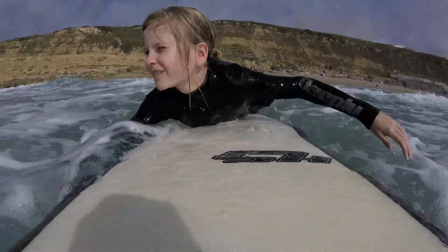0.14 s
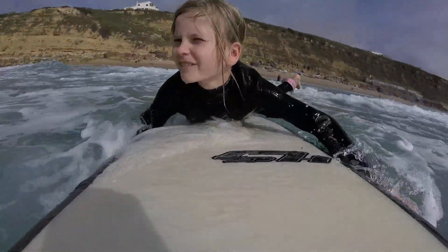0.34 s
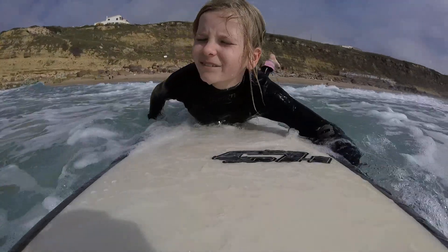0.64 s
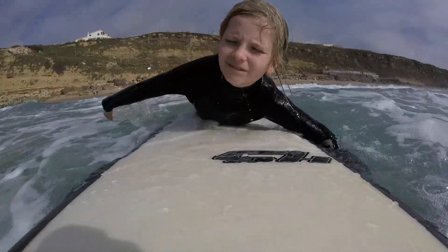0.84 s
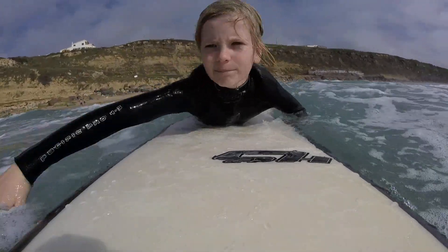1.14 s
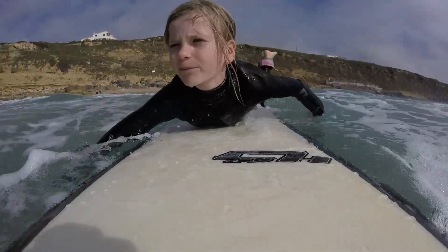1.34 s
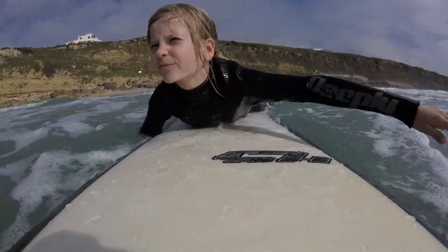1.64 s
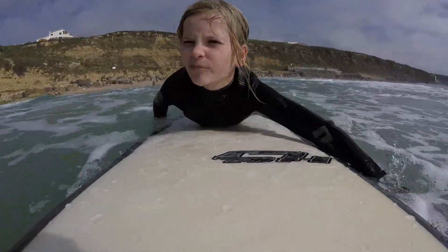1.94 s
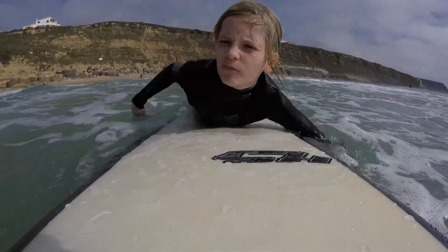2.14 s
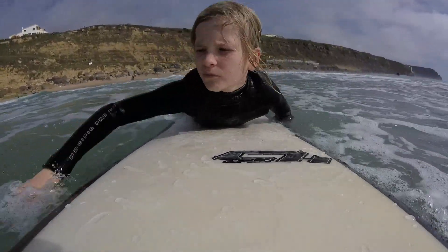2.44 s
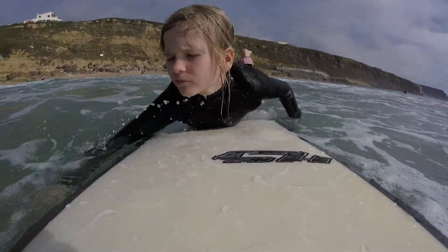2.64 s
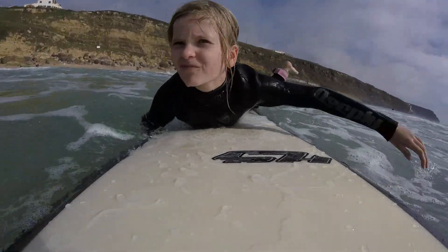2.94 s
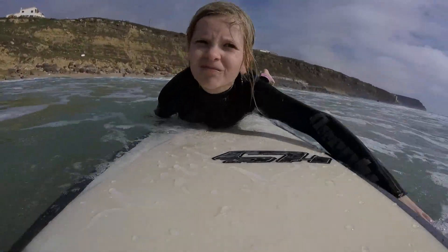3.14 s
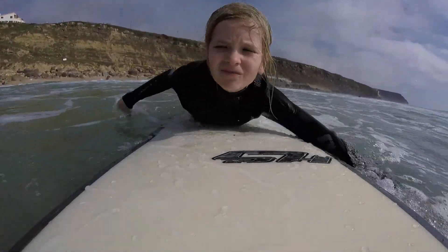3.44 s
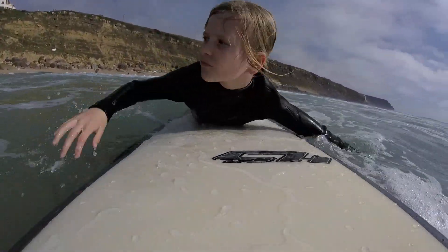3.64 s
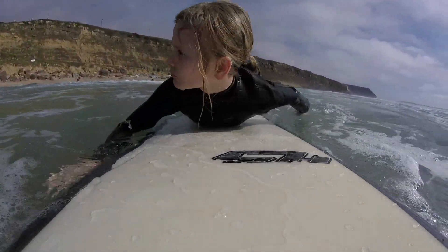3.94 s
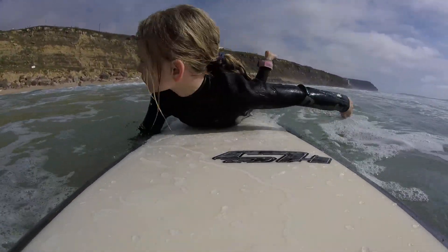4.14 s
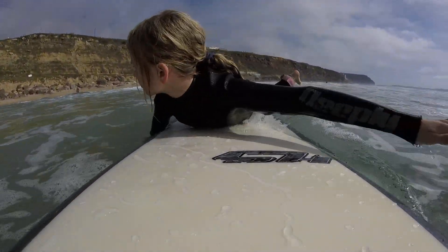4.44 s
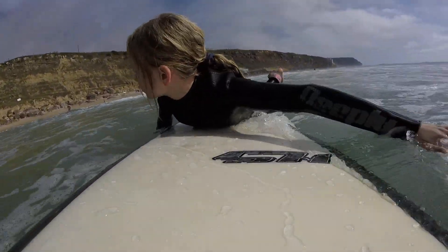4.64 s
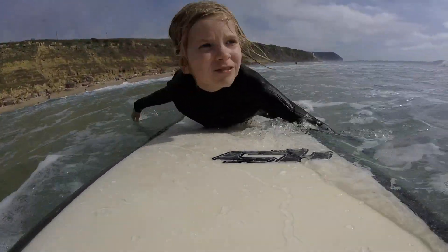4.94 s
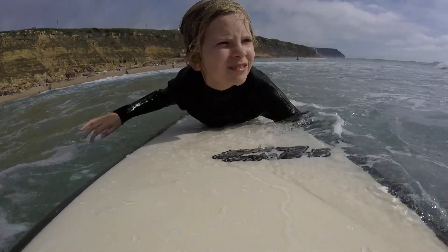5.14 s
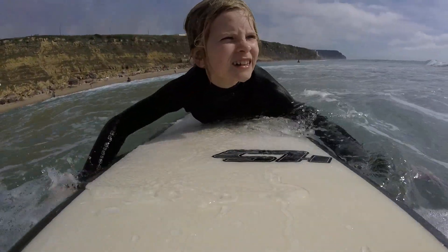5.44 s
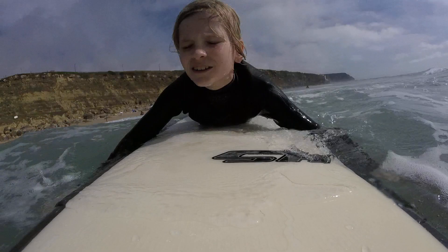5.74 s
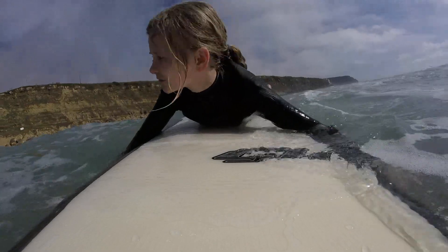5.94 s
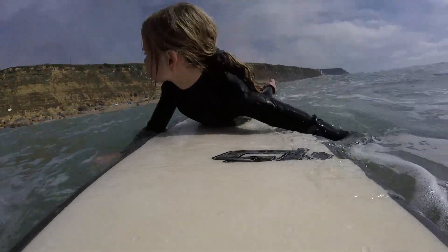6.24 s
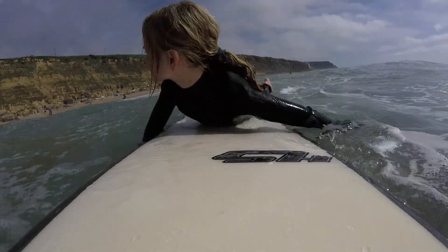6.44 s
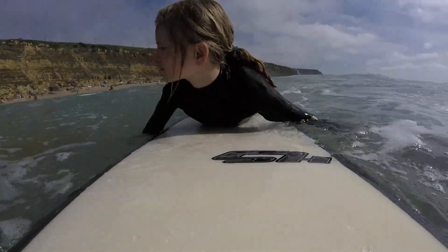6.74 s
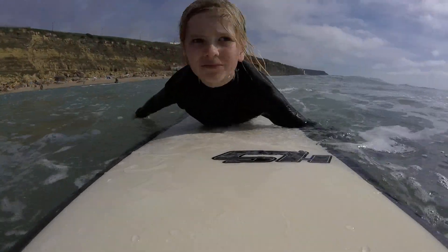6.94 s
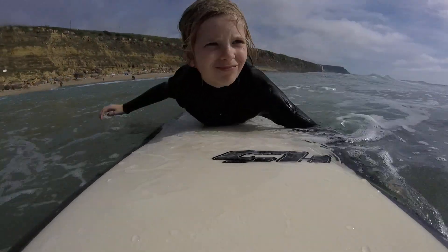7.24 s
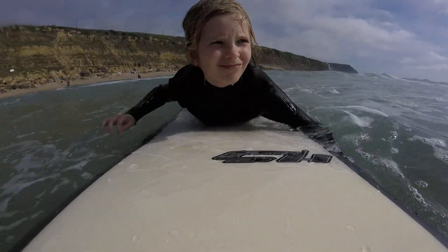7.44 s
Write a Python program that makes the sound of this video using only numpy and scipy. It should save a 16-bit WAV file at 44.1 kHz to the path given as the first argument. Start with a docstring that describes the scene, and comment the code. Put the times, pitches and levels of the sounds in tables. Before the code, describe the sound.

Seawater laps, splashes and gurgles against a paddled surfboard, with dull hull slaps, a low throbbing hum and a few rubbery squeaks, heard boxed-in.

```python
"""A low hum and lapping water open the scene: a surfboard is paddled through foam, heard in a sealed case on its nose.
Slaps are pulsed sines that ring the board's modes; splats are puffs of filtered noise around bubbles.
Splash and gurgle are shaped noise and bubble rings; rubber squeaks are stacks of partials with a rasp.
Air pockets hum as brief sines, a slow bending mode and a weaker neighbour beat in the board,
and the sea hisses dully as shaped noise, joined near the end by a steady hiss of foam."""
import sys
import numpy as np
from scipy import signal
from scipy.fft import rfft, irfft
from scipy.io import wavfile
from scipy.ndimage import uniform_filter1d

SR = 44100
rng = np.random.default_rng(int(sys.argv[2]) if len(sys.argv) > 2 else 0)


def output_pcm(signal):
    """Save a mono or channel-first signal as 16-bit PCM at the path in sys.argv[1].

    Samples are clipped to [-1, 1] before scaling.
    """
    pcm = np.clip(np.atleast_2d(signal).T, -1, 1) * 32767
    wavfile.write(sys.argv[1], SR, np.round(pcm).astype(np.int16))


N = 334719  # length in samples

# bending of the whole board: t/s, level/dB
BENDING = [(0, -34), (.4, -32.5), (.47, -28), (.64, -24), (1.03, -31), (1.14, -19), (1.41, -22.5),
           (1.58, -21.5), (1.8, -37.5), (2.03, -28), (2.37, -41), (3.01, -26.5), (3.45, -41.5),
           (5.18, -43.5), (5.26, -32.5), (5.49, -46), (5.6, -31), (6.13, -48), (6.55, -33.5), (6.75, -41.5),
           (6.81, -21.5), (6.92, -18), (7.03, -22.5), (7.59, -44.5)]
# spectral colour that case and board give the water: f/Hz, relative density/dB per Hz
CASE_COLOUR = [(200, -25.5), (300, -29), (470, -3.5), (620, -7), (740, -3), (900, -21.5), (1150, -3),
               (1600, -4.5), (2250, -4.5), (2700, -12.5), (3700, -20), (4800, -16), (5600, -32),
               (8000, -35.5), (15000, -87)]


def amp(db):
    """Level definition: an amplitude ratio is ten to the power dB/20."""
    return 10 ** (np.asarray(db) / 20)


def evened(x):
    """Normalisation: dividing by the root mean square gives rms one."""
    return x / np.sqrt(np.mean(x ** 2) + 1e-20)


def read(points, hz):
    """Spectral envelope: interpolate linearly over logarithmic frequency."""
    f, value = np.transpose(points)
    return np.interp(np.log(hz + 1), np.log(f + 1), value)


def curve(rows, t):
    """Time envelope: interpolate each column linearly over time."""
    s, *columns = np.transpose(rows)
    return [np.interp(t, s, c) for c in columns]


def add(mix, s, sound):
    """Superposition: pressures sum, here from s seconds onward."""
    part = mix[max(round(s * SR), 0):][:len(sound)]
    part += sound[:len(part)]


def wander(size, span):
    """Slow random drift of rms one: white noise under two moving averages."""
    smooth = uniform_filter1d(rng.standard_normal(size), span)
    return evened(uniform_filter1d(smooth, span))


def noise(shape, size, patchy_db, flicker_db):
    """Random short-time spectra: patches in time and pitch, and a flicker shared by all pitches."""
    hop = size // 4
    frames, hz = N // hop + 5, np.fft.rfftfreq(size, 1 / SR)
    real, imaginary, patches = rng.standard_normal((frames, len(hz), 3)).T
    patches = uniform_filter1d(patches, size=5, axis=0)  # over pitch
    patches = evened(uniform_filter1d(patches, size=8, axis=1))  # over time
    flicker = wander(frames, span=3)
    level_db = read(shape, hz)[:, None] + patchy_db * patches + flicker_db * flicker
    spectra = (real + 1j * imaginary) * amp(level_db)
    return evened(signal.istft(spectra, nperseg=size, noverlap=size - hop)[1][:N])


def puff(size, hz, octaves):
    """Band-pass filtering: noise in the colour of the case, gathered around one pitch."""
    f = np.fft.rfftfreq(size, 1 / SR)
    band = 1 + (np.log2((f + 1) / hz) / octaves) ** 4
    gain = amp(read(CASE_COLOUR, f)) / band
    return evened(irfft(rfft(rng.standard_normal(size)) * gain, size))


def bubble(hz, cycles, glide):
    """Damped resonance: a softly started ring dies to 1/e in so many cycles and may rise in pitch."""
    turns = np.arange(2048) / SR * hz
    ring = np.sin(2 * np.pi * turns * (1 + glide * turns / cycles))
    return ring * np.exp(-turns / cycles) * (1 - np.exp(-turns / 0.5)) ** 2


def flex():
    """Beating of modes: the bending tone wavers in pitch and throbs against a weaker, lower mode."""
    bend_hz, beat_hz = 38.55, 4.27
    lower_share, beat_top_s = 0.36, 0.043  # amplitude ratio; a moment when both modes agree in phase
    t = np.arange(N) / SR
    level_db, = curve(BENDING, t)
    turns = np.cumsum(bend_hz * (1 + 0.0417 * wander(N, span=2500))) / SR
    lower_turns = turns - beat_hz * (t - beat_top_s)
    modes = np.sin(2 * np.pi * turns) + lower_share * np.sin(2 * np.pi * lower_turns)
    return np.sqrt(2) * amp(level_db) * modes


def slap(level_db, hz, ring_db):
    """Impulse excitation: a brief push with a rising gulp behind it also rings the board's modes."""
    # modes of the board: f/Hz, relative level/dB, 60 dB decay time/s
    modes = [(60.8, -4.5, 0.39), (201.6, -1.5, 0.16), (451, 5, 0.031)]
    t = np.arange(12000) / SR
    push = np.sin(2 * np.pi * hz * t) * np.exp(-((t * hz - .8) / 0.57) ** 2)
    add(push, 1 / hz, 0.3 * bubble(hz, 3.7, 0.05))  # the gulp, one cycle later
    phase = 0.27 * rng.random(len(modes))  # in turns
    ring = np.zeros(len(t))
    for (f, db, t60), p in zip(modes, phase):
        ring += amp(db - 60 * t / t60) * np.sin(2 * np.pi * (f * t + p))
    onset = 1 - np.exp(-t / 0.00052)
    return amp(level_db) * (push + amp(ring_db) * ring * onset)


def splat(level_db, hz, treble_db):
    """Trapped-bubble resonance in a puff of spray, with a brighter tick; big ones spatter longer."""
    t = np.arange(2048) / SR
    gone = np.clip(0.017 + 0.0013 * (level_db + 32.5), .008, .05)  # s until the puff is 60 dB down
    rise = 1 - np.exp(-(t / 0.0009) ** 2)
    spatter = 0.5 * puff(len(t), hz, 0.61) * amp(-60 * (t / gone) ** 1.6)
    body = spatter + 1.38 * bubble(hz, 5.36, 0.0093)
    tick = amp(treble_db) * puff(len(t), 4280, 0.74) * amp(-60 * (t / (0.7 * gone)) ** 2.57)
    return amp(level_db) * rise * (body + tick)


def squeak(rows):
    """Stick-slip friction: quick slips make a stack of partials, uneven and rasping at light pressure."""
    # the deck's effect on the second partial: its f/Hz, level against the first/dB
    deck_lift = [(2000, -2.5), (2200, 4), (2300, -7), (2410, -27.5)]
    # partials three to six, relative to the first two: level/dB
    upper_levels = [-39, -40, -52, -58]
    rasp_db, deck_hz, deck_db = -1, 2230, -22  # noise gains scaled by the first partial's level
    t = np.arange(rows[0][0], rows[-1][0], 1 / SR)
    hz, first_db = curve(rows, t)
    second_db = first_db + read(deck_lift, 2 * hz)
    # weak squeaks stand for light pressure: loose nears one
    loose = np.clip((-33.5 - np.maximum(first_db, second_db)) / 10, .04, 1)
    drift = 0.0092 * wander(len(t), span=150)
    jitter = 0.05 * loose * wander(len(t), span=40)
    phase = 2 * np.pi * np.cumsum(hz * (1 + drift + jitter)) / SR
    upper = np.zeros(len(t))
    for k, db in enumerate(upper_levels):
        upper += amp(db + 2.5 * wander(len(t), span=200)) * np.sin((k + 3) * phase)
    tone = amp(first_db) * np.sin(phase) + (amp(first_db) + 2 * amp(second_db)) * upper
    tone = tone + amp(second_db + 1.2 * wander(len(t), span=120)) * np.cos(2 * phase)
    tone = (1 - .6 * loose) * tone
    rasp = amp(rasp_db) * loose * puff(len(t), 1200, 0.85)
    deck_ring = amp(deck_db) * puff(len(t), deck_hz, 0.04)
    tone = tone + amp(first_db) * (rasp + deck_ring)
    grip = 1 + 0.11 * wander(len(t), span=120) + 0.12 * loose * wander(len(t), span=40)
    fade = np.minimum(np.minimum(t - t[0], t[-1] - t) / 0.0026, 1)
    return np.sqrt(2) * tone * grip * fade


def bloop(db, hz, length):
    """Air-pocket resonance: a tone of steady pitch starts quickly, sags a little and dies steeply."""
    t = np.arange(4096) / SR
    fall_db = -4. * t / length - 2400 * np.maximum(t - length, 0)
    shape = np.minimum(t / 0.002, 1) * amp(fall_db)
    return amp(db) * shape * np.sin(2 * np.pi * hz * t)


def water():
    """Superposed turbulence: hiss and bubbles, a lumpy low slosh, fine droplets and the far sea."""
    # slosh along the hull: f/Hz, relative density/dB per Hz
    hull_colour = [(40, 2.5), (60, 12), (100, -10.5), (150, -10), (220, -12.5), (270, -20.5), (400, -24.5),
                   (800, -66.5)]
    # far surf: f/Hz, relative density/dB per Hz
    sea_colour = [(200, 10.5), (500, 4), (900, -5.5), (1500, 0), (2300, -22.5), (3000, -4), (4800, -15),
                  (6300, -10.5), (9000, -20.5), (15000, -27.5)]
    t = np.arange(N) / SR
    splash_db = np.interp(t, t[::64], splash_level(t[::64]))
    bend_db, = curve(BENDING, t)
    bubbles = gurgle(850, 4.8)
    bubble_db = -0.1 + 0.18 * (splash_db + 48)  # against the hiss: stronger splashes are more bubbly
    hiss = noise(CASE_COLOUR, size=256, patchy_db=2.5, flicker_db=3.5)
    splash = hiss + amp(bubble_db) * bubbles
    stir_db = 0.81 * (splash_db + 53.0) + 0.33 * (bend_db + 37.5)  # splash and bending stir the hull
    slosh = amp(-50.5 + stir_db) * noise(hull_colour, size=1024, patchy_db=1.5, flicker_db=0.5)
    droplets = amp(-69.5 + 0.33 * (splash_db + 53.5)) * spray(50, 3)
    sea = amp(-57) * noise(sea_colour, size=1024, patchy_db=3.0, flicker_db=1.24)
    return amp(splash_db) * splash + slosh + droplets + sea


def splash_level(t):
    """Energy addition: splashes build up, hold and drain over calm lapping; result in dB."""
    # splashes along the board: top t/s, level/dB, build-up time/s, hold time/s
    surges = [(0.262, -47.5, 0.22, 0.27), (0.57, -38, 0.058, 0.0038), (0.686, -49.5, 0.071, 0.24),
              (1.298, -41.5, 0.025, 0.096), (1.659, -47, 0.1, 0.0045), (2.038, -46, 0.26, .005),
              (2.58, -38.5, 0.0072, .005), (2.857, -48.5, 0.037, .005), (3.152, -44.5, 0.014, 0.0035),
              (3.352, -48.5, 0.036, 0.0046), (3.914, -43, 0.076, .005), (4.304, -45, 0.012, 0.021),
              (4.705, -43.5, 0.16, 0.049), (4.997, -51.5, 1, 0.16), (5.914, -44.5, 0.22, .005),
              (6.21, -50, 0.027, 0.0057), (6.482, -43, 0.075, 0.0046), (6.771, -41.5, 0.015, 0.0054),
              (6.847, -40, 0.031, 0.0045)]
    calm_db, build_db, drain_db_per_s = -54.5, 20.5, 180  # lapping, climb over the build-up, fall
    power = amp(2 * calm_db)
    for top, db, build, hold in surges:
        before_db = build_db * np.maximum(top - t, 0) / build
        after_db = drain_db_per_s * np.maximum(t - top - hold, 0)
        power = power + amp(2 * (db - np.minimum(before_db + after_db, 100)))
    return 10 * np.log10(power)


def gurgle(per_s, spread_db):
    """Bubble resonance at random instants: many small strengths, a few large, coloured by the case."""
    strike = rng.random(N) < per_s / SR
    size = amp(spread_db * np.minimum(rng.exponential(1, N), 3.5)) * strike
    pitches = np.geomspace(400, 6000, 40)
    kind, out = rng.integers(0, len(pitches), N), np.zeros(N)
    for k, hz in enumerate(pitches):
        long, glide = rng.random(2)
        cycles = (2.0 + 8 * long ** 2) * np.sqrt(hz / 1500)
        gain_db = read(CASE_COLOUR, hz) + 1.48 * np.log2(hz / 1500)
        ring = amp(gain_db) * bubble(hz, cycles, 0.032 * glide)
        out += signal.oaconvolve(size * (kind == k), ring)[:N]
    return evened(out)


def spray(per_s, spread_db):
    """Random impacts: fine droplets tick on the case as short rings in the treble."""
    strike = rng.random(N) < per_s / SR
    size = amp(spread_db * np.minimum(rng.exponential(1, N), 4.5)) * strike
    kind, out = rng.integers(0, 12, N), np.zeros(N)
    for k, hz in enumerate(np.geomspace(3000, 13000, 12)):
        ring = amp(0.26 * read(CASE_COLOUR, hz)) * bubble(hz, 4.1, 0.011)
        out += signal.oaconvolve(size * (kind == k), ring)[:N]
    return evened(out)


def foam():
    """Band-shaped noise: foam left by the last slap sets in as a fine hiss and stays."""
    # foam hiss: f/Hz, relative density/dB per Hz
    foam_colour = [(2000, -45), (3000, -20), (3650, 0), (4200, -3), (5200, -22), (7000, -55)]
    start_s, rise_s, level_db = 6.87, .1, -63
    swell = np.clip((np.arange(N) / SR - start_s) / rise_s, 0, 1)
    return amp(level_db) * swell * noise(foam_colour, size=512, patchy_db=1.0, flicker_db=.6)


def scene():
    """Superposition of the continuous sources and the timed events."""
    # waves slapping the hull: t/s, level/dB, push f/Hz, board ring against the push/dB
    slaps = [(0.205, -23.5, 147, -26), (.217, -28, 183, -18), (0.425, -30, 86, -10), (0.582, -39, 204, 6),
             (1.43, -28.5, 154, -2.5), (2.579, -30, 202, 4), (2.872, -25, 137, -34),
             (2.947, -26.5, 139, -28), (3.162, -34, 180, 1.5), (4.626, -34, 128.4, -14),
             (5.216, -36, 109, -8), (5.309, -36, 138, -14), (6.7715, -19, 100, -6)]
    # drops and hand splashes on the deck: t/s, level/dB, f/Hz, treble tick against the body/dB
    splats = [(0.284, -27.5, 1360, -12.5), (0.325, -34.5, 702, -17), (0.334, -28.5, 1680, -18),
              (0.44, -32.5, 1290, -27), (0.494, -31, 2110, -31), (0.503, -31, 1520, -28),
              (0.573, -25.5, 1510, -27), (0.587, -32, 2620, -15), (0.667, -29.5, 2150, -27),
              (0.718, -28.5, 2170, -24), (0.843, -36, 500, -28), (1.203, -33.5, 1620, -14),
              (1.254, -29.5, 1870, -36), (1.325, -34, 1430, -23), (1.388, -26, 1740, -8.5),
              (1.427, -28.5, 1500, -25), (1.436, -31.5, 706, -29), (2.577, -25, 1270, -32),
              (2.694, -28, 3300, -33), (3.021, -29, 1850, -7), (3.087, -28, 1066, -39),
              (3.158, -23, 1680, -29), (3.163, -25, 1243, -17), (3.365, -37, 2300, 3),
              (3.718, -34, 2140, -13), (3.838, -26.5, 2090, -21), (3.964, -40, 650, 8),
              (4.609, -30.5, 2140, -16), (4.695, -29, 1280, -27), (4.708, -28.5, 1530, -25),
              (4.749, -33, 2300, -25), (4.758, -31, 2230, -7), (4.779, -35, 1100, -30),
              (4.955, -28, 1680, -20), (4.975, -31.5, 1920, -21), (4.998, -35, 2230, -25),
              (5.021, -29.5, 1730, -16.5), (5.074, -34, 488, -29), (5.077, -32.5, 1296, -22),
              (5.217, -31.5, 1250, -33), (5.423, -27, 2970, -24), (5.454, -31, 1084, -19),
              (5.483, -25, 2210, -37), (5.664, -30, 1790, -14.5), (5.701, -29, 2920, -21),
              (5.8, -31.5, 1630, -17), (5.845, -33.5, 1510, -9), (5.87, -29.5, 1450, -35),
              (5.913, -21, 1680, -25), (5.936, -25.5, 1720, -11.5), (5.96, -29.5, 1780, -30),
              (6.122, -37.5, 4780, -17), (6.247, -23.5, 1118, -38), (6.365, -35.5, 2230, -37),
              (6.401, -26.5, 2030, -21.5), (6.415, -22.5, 1760, -38), (6.434, -30, 2260, -28),
              (6.465, -33, 1560, -29), (6.491, -27, 2350, -32), (6.5, -33.5, 2270, -7),
              (6.521, -36, 1024, 3), (6.534, -33.5, 1520, -32), (6.559, -33.5, 2040, -29),
              (6.771, -27, 2070, -18.5), (6.79, -19.5, 1470, -40), (6.827, -26.5, 1055, -28),
              (6.863, -28, 1780, -4.5), (6.883, -29, 1580, -24), (7.005, -38, 1460, -27),
              (7.34, -42.5, 557, 8.5), (7.476, -31, 1330, -31)]
    # wet rubber slipping and sticking, one list per squeak: t/s, f/Hz, first partial level/dB
    squeaks = [
        [(2.936, 1033, -61), (2.947, 1153, -32.5), (2.962, 1109, -35.5), (2.982, 1050, -40),
         (2.998, 1053, -36.5), (3.012, 1050, -56)],
        [(4.228, 1005, -58), (4.245, 1134, -35.5), (4.258, 1120, -74)],
        [(4.298, 1103, -45), (4.33, 1044, -39), (4.342, 992, -36.5), (4.383, 1008, -32.5), (4.389, 1161, -28.5),
         (4.425, 1216, -25.5), (4.472, 1193, -28.5), (4.488, 1288, -26), (4.525, 1208, -35), (4.575, 1415, -50)],
        [(6.227, 934, -48), (6.236, 1105, -31), (6.248, 1125, -24.5), (6.266, 1100, -31), (6.275, 1490, -41),
         (6.29, 1390, -46.5)],
    ]
    # air pockets along the rail: t/s, level/dB, f/Hz, time to the steep fall/s
    bloops = [(0.891, -35.5, 308, 0.012), (2.257, -42, 755, 0.04), (2.452, -41.5, 745, 0.0097),
              (3.963, -33, 725, 0.018), (5.575, -40, 737, 0.018), (6.014, -40.5, 582, 0.014),
              (6.77, -15, 485, 0.0048)]
    mix = flex() + water() + foam()
    for s, *row in slaps:
        add(mix, s, slap(*row))
    for s, *row in splats:
        add(mix, s, splat(*row))
    for rows in squeaks:
        add(mix, rows[0][0], squeak(rows))
    for s, *row in bloops:
        add(mix, s, bloop(*row))
    return mix[None]


def record(dry):
    """Band limitation: a linear-phase low-pass removes the highest treble."""
    edge_hz = 15030
    lowpass = signal.firwin(511, edge_hz, window=("kaiser", 9), fs=SR)
    return signal.oaconvolve(dry, lowpass[None], "same")


dry = scene()
out = record(dry)
output_pcm(out)
```